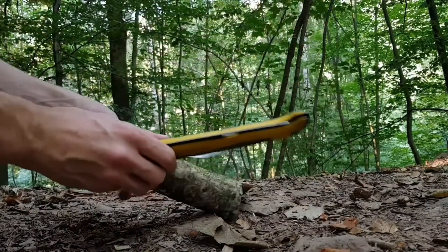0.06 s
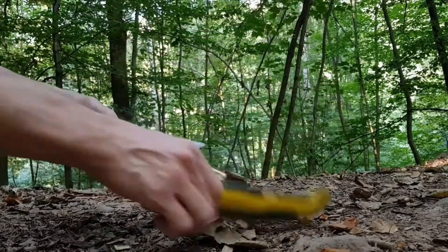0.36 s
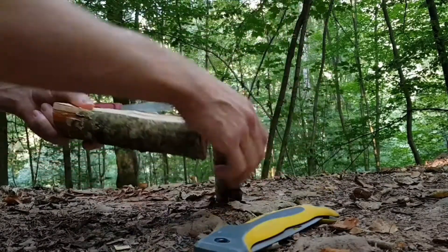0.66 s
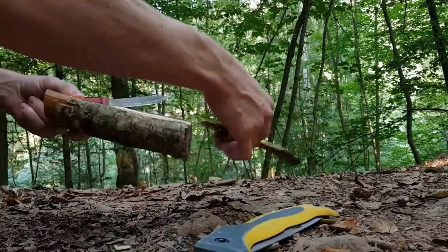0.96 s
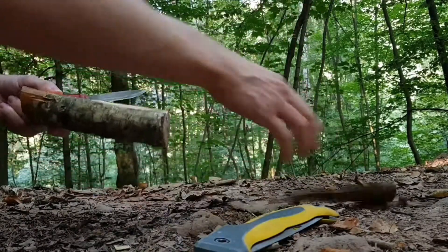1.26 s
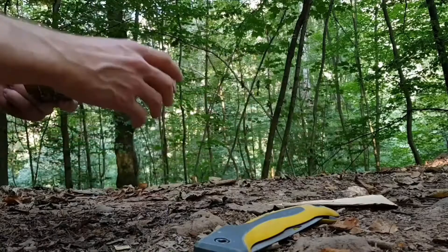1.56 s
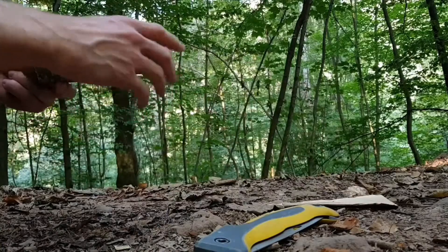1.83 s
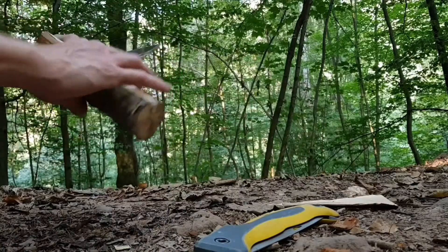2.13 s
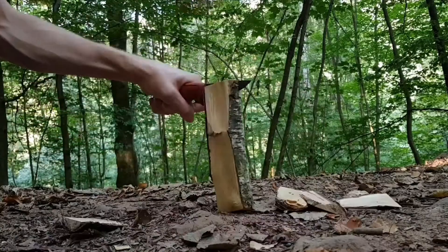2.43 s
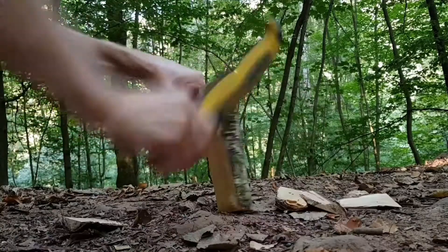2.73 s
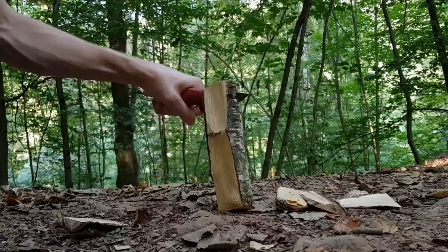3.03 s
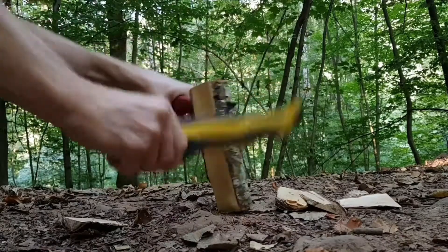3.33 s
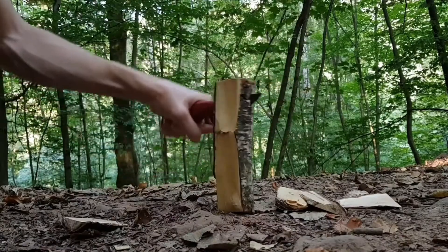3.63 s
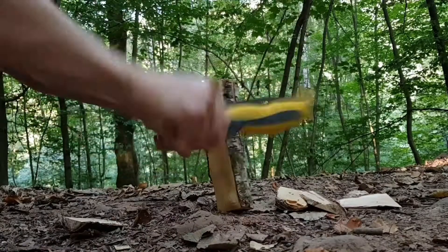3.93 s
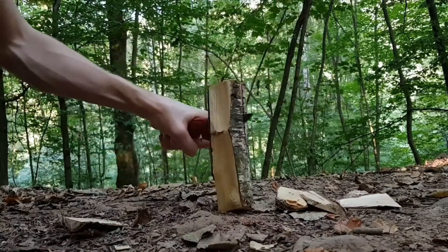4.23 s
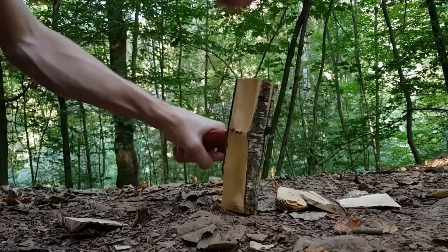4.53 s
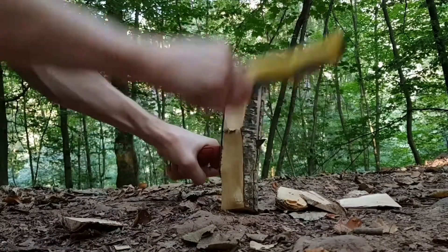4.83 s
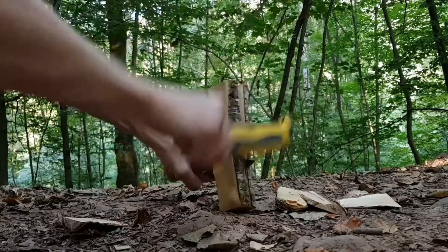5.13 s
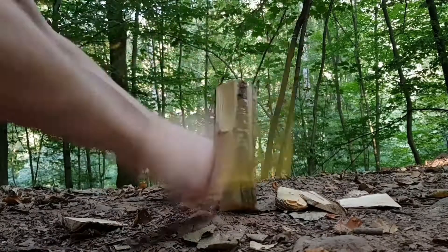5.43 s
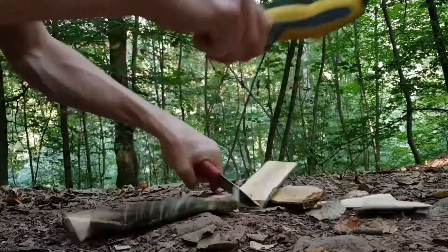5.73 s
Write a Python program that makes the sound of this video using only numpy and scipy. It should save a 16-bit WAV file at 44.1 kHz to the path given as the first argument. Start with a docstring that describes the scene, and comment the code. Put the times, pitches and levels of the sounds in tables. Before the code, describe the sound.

The sounds are close and in stereo on a quiet forest floor. At about 0.4 seconds a soft knock and a crunch of dry leaves lead into a folding saw clattering down at 0.6. A stick lands lightly in the leaves around 1.3. A distant engine hums faintly, clearest near 2.2 seconds. Then the saw's handle strikes a knife wedged in an upright log seven times, at about 2.8, 3.3, 3.9, 4.3, 4.7, 5.1 and 5.5 seconds. Each blow is a sharp clack with a woody thud, a faint ring of steel, a crackle of crushed leaves and a short echo from the trunks. Two barely audible, very high whistles arch up and down near 3.7 and 5.4. The last blow splits the log, and the halves tumble with lighter knocks and rustles until about 5.9, as the soft air in the treetops rises slightly.

```python
"""A knife is beaten down through an upright log, close to a stereo pair of microphones on a forest floor.
A folding saw and a stick drop on dry leaves; then the saw's handle strikes the knife seven times, until
the halves fall apart. Each blow thuds, clacks, rings the steel and grinds the log into crackling litter.
The trunks scatter it back; farther off are a humming engine and the air in the canopy.
Two faint, very high, wavering whistles arch up and down."""
import sys
import numpy as np
from scipy import signal
from scipy.fft import rfft, irfft, next_fast_len
from scipy.io import wavfile

SR = 44100
rng = np.random.default_rng(int(sys.argv[2]) if len(sys.argv) > 2 else 0)


def generate_wav(sig):
    """Save sig (samples, or channels by samples) to the path in sys.argv[1] as 16-bit PCM at SR."""
    pcm = np.round(np.clip(np.atleast_2d(sig).T, -1, 1) * 32767).astype(np.int16)
    wavfile.write(sys.argv[1], SR, pcm)


N = 259308
TOP_HZ = 16000  # the recorder's band limit
CHOPPING_S = 2  # from here on the log stands upright on trodden ground

# the handle strikes the knife's spine: t/s, thud/dB, body/dB, body/Hz, clack/dB, clack/Hz, crack/dB,
# rebound/dB, crushed leaves/dB, their crispness/dB, left-right/dB
BLOWS = [(2.7588, -26.5, -29.5, 700, -10.5, 3900, -20.5, -.5, -27, 4.5, -1.5),
         (3.2504, -21, -23, 730, -15.5, 3350, -17.5, -10, -33, 6, -2),
         (3.8779, -26.5, -28, 1020, -14, 4100, -25, -14, -37, 9.5, -2),
         (4.2802, -26, -23, 1000, -12, 4100, -16, -3.5, -29.5, 8, -4),
         (4.7108, -30, -29, 880, -18.5, 3500, -15, -5, -29.5, 4.5, -3),
         (5.1119, -28.5, -22, 1330, -13.5, 4000, -16, -.5, -27.5, 3.5, -2),
         (5.4886, -23, -21, 1230, -12, 2850, -18.5, 2.5, -23.5, 0, -3)]


def contacts():
    """Every hard contact in front of the microphones: three to a blow, one to a loose knock."""
    # offsets from the blow: delay/s, thud/dB, body/dB, body f ratio, clack/dB, clack f ratio, crack/dB
    touch = (0, -4, -1, 1.03, -4, 1.02, -5.5)  # handle on steel
    bite = (.0024, -1, -2, .68, -.6, .8, 1)  # steel into wood
    rebound = (.0098, -7, -3.5, .95, -5.3, .64, 1.2)  # log against the ground
    # saw, handle and falling halves:
    # t/s, thud/dB, body/dB, body/Hz, body t60/s, clack/dB, clack/Hz, crack/dB, left-right/dB
    loose_knocks = [(0.4042, -31, -33, 400, .027, -60, 2240, -53, -.5),
                    (0.5605, -54, -25.5, 1060, .055, -13.5, 2010, -39, -3),
                    (0.5655, -54, -25, 1075, .11, -20, 1854, -30.5, -10),
                    (4.7711, -39, -27, 1086, .019, -18, 2270, -24.5, -4.5),
                    (5.5023, -21, -20.5, 620, .019, -18.5, 3690, -21, 4.5),
                    (5.537, -34, -29.5, 1200, .018, -31, 2070, -40, 0),
                    (5.6245, -55, -46, 500, .01, -45, 2610, -51, 0),
                    (5.7222, -39, -26.5, 930, .024, -18.5, 2130, -59, -5.5),
                    (5.76, -48, -43, 562, .02, -49, 4710, -57, -7),
                    (5.778, -42, -39, 505, .024, -46, 1630, -49, -3),
                    (5.793, -49, -29, 1543, .07, -26, 1580, -47, 5.5),
                    (5.8064, -45, -32.5, 560, .026, -34, 1630, -61, -.5),
                    (5.8692, -58, -39, 564, .016, -50, 2730, -53, -4)]
    first_thud_hz, thud_rise_hz, loose_thud_hz = 139, 2.5, 190  # the thud rises as the knife sinks
    body_t60 = .017
    for k, row in enumerate(BLOWS):
        s, thud_db, body_db, body_hz, clack_db, clack_hz, crack_db, rebound_db, _, _, pan_db = row
        parted = k == len(BLOWS) - 1
        thud_hz = loose_thud_hz if parted else first_thud_hz + thud_rise_hz * k
        for offsets, db in [(touch, 0), (bite, 0), (rebound, rebound_db)]:
            delay, thud, body, body_ratio, clack, clack_ratio, crack = offsets
            yield (s + delay, thud_db + thud + db, thud_hz,
                   body_db + body + db, body_hz * body_ratio, body_t60,
                   clack_db + clack + db, clack_hz * clack_ratio, crack_db + crack + db, pan_db)
    for s, thud_db, *wood in loose_knocks:
        yield s, thud_db, loose_thud_hz, *wood


def knocks():
    """A contact thumps the ground, sounds two damped wood resonances, cracks and rings."""
    # spectra of a brief bright hiss and of cracking wood: f/Hz, level/dB
    hiss_spectrum = [(2500, -17), (4500, -3.5), (6000, -1), (7500, -8.5), (12000, -10), (16000, -14.5)]
    crack_spectrum = [(3000, -28.5), (5200, -1.5), (6300, 3.5), (8500, -4), (11000, 2), (13000, 1),
                      (16000, -3)]
    # modes of the struck blade and log: f/Hz, level/dB, t60/s
    ring_modes = [(1066, -0.5, .09), (1504, -5.5, 0.16), (1620, 0.5, .16), (1850, -5, 0.25),
                  (2460, -2, .12), (2871, -0.5, 0.13), (4358, -5.5, .09), (4400, -4.5, .09),
                  (6262, -1, 0.08), (7865, 0, .14), (11800, -3.5, 0.092), (12675, -1.5, 0.17)]
    out = np.zeros((2, N))
    clock = np.arange(-SR // 80, SR // 3) / SR
    t = np.maximum(clock, 0)
    for row in contacts():
        s, thud_db, thud_hz, body_db, body_hz, body_t60, clack_db, clack_hz, crack_db, pan_db = row
        # the hiss swells into each knock and dies just after it
        hiss = noise(hiss_spectrum, len(t)) * np.exp(-np.abs(clock) / .0022)
        thud = mode(t, thud_hz, t60=.032, attack=.001)
        thud += .48 * burst(t, band(thud_hz * .96, skirt_db=14), t60=.14, attack=.0015)
        sharpness = min(body_t60 / .017, 3)  # the longer a piece rings, the narrower its resonance
        body = .83 * mode(t, body_hz, body_t60, attack=.0003)
        body += .84 * burst(t, band(body_hz, skirt_db=20 * sharpness), t60=.02, attack=.00098)
        clack = .56 * mode(t, clack_hz, t60=.013, attack=.0002)
        clack += .6 * burst(t, band(clack_hz, skirt_db=48.5), t60=.013, attack=.0004)
        crack = burst(t, crack_spectrum, t60=.016, attack=.0007)
        grip = 1 + rng.normal(0, .0017)  # the wood clamps the blade a little differently each time
        ring = np.zeros((2, len(t)))
        for hz, db, t60 in ring_modes:
            envelope = (clock > 0) * amp(db + rng.normal(0, 2)) * fade(t, t60)
            ring += envelope * np.sin(2 * np.pi * hz * grip * t + rng.uniform(0, 2 * np.pi, (2, 1)))
        wood = amp(thud_db - 4.5) * thud + amp(body_db) * body + amp(clack_db - 2) * clack
        edge = amp(crack_db) * (.85 * crack + amp(-7.5) * hiss + amp(-21.5) * ring)
        add(out, s + clock[0], wood + edge, pan_db)
    return out


def mode(t, hz, t60, attack):
    """A damped resonance, kept to its own band, reaching the two microphones a little apart."""
    t = np.maximum(t - rng.uniform(0, .00009, (2, 1)), 0)
    ringing = np.sin(2 * np.pi * hz * t) * fade(t, t60) * (1 - np.exp(-t / attack))
    own_band = signal.butter(2, [hz / 2, hz * 1.9], "band", fs=SR, output="sos")
    return fixed_energy(signal.sosfilt(own_band, ringing))


def burst(t, spectrum, t60, attack):
    """A crowd of quickly dying resonances, heard as a puff of coloured noise."""
    puff = rng.standard_normal((2, len(t))) * fade(t, t60) * (1 - np.exp(-t / attack))
    return fixed_energy(stereo(puff, spectrum))


def band(centre_hz, skirt_db):
    """The spectrum of a broad resonance, falling by skirt_db two octaves away."""
    return [(centre_hz * 2 ** k, -skirt_db * (k / 2) ** 2) for k in np.arange(-3, 3.5, .5)]


def blade():
    """The steel sings faintly after a blow, lower once wedged, wavering as the wood shifts its grip."""
    free, wedged = (3680, -51.5, .95), (2180, -60, 1.3)  # f/Hz, level/dB, t60/s
    out, t = np.zeros((2, N)), np.arange(SR) / SR
    for k, (s, *_) in enumerate(BLOWS[:-1]):  # the last blow frees the knife
        hz, db, t60 = wedged if k else free
        tone = waver(SR, corner_hz=35) * np.sin(2 * np.pi * hz * t)
        add(out, s, amp(db) * fade(t, t60) * tone, pan_db=-1)
    return out


def leaf_loads():
    """Every load on the leaves: under each blow, under things that land, and under stirring hands."""
    # the log grinds in and settles after a blow: delay/s, level/dB, soil/dB, crispness/dB, rise/s
    grind = [(.026, -.5, -11, 0, .011), (.052, -10, -17, -1, .009)]
    # something lands or shifts: peak t/s, level/dB, soil/dB, crispness/dB, rise/s, left-right/dB
    landings = [(0.398, -63, -3, 8, .012, 0), (0.419, -39, -6, 9, .003, 0),
                (0.433, -30, -15, 13.5, .003, -4), (0.446, -31.5, -11, 6.5, .004, 0),
                (0.467, -34.5, -10, 2.5, .012, -2), (0.573, -27.5, -26, 4, .02, -1),
                (0.623, -29.5, -24, 13.5, .0038, -1), (0.642, -37, -16, 0, .014, -5),
                (0.787, -74, -4, 20, .003, 5), (0.955, -68, -9, 13.5, .009, 1),
                (1.235, -48, -3, 4, .015, -7), (1.261, -41, -6, 7, .007, -4),
                (1.299, -51, -1, 5, .023, -1.5), (2.651, -66, -12, 7, .003, -4),
                (2.736, -48, -6, 2, .007, -18), (2.754, -39, -6, 0, .007, -14),
                (4.492, -60, -8, 0, .03, -2), (4.782, -31, -5, 9.5, .008, -1.5),
                (4.81, -41, -9, -1, .022, -3), (5.251, -57, -5, 2, .009, 0), (5.554, -35, -1, 6, .007, -.5),
                (5.61, -49, 0, -3, .02, 0), (5.708, -46, 3, -2, .016, -1), (5.801, -46, -5, 4.5, .013, -.5)]
    # hands stir the leaves faintly: start/s, end/s, level/dB, crispness/dB
    stirring = [(.125, .33, -80, 17.5), (.71, .84, -73.5, 13), (3.72, 3.82, -75, 6)]
    stirs_per_s, stir_soil_db, stir_rise_s = 16, -3, .034
    for s, *_, leaves_db, crispness_db, pan_db in BLOWS:
        for delay, db, soil_db, crisper_db, rise in grind:
            yield s + delay, leaves_db + db, soil_db, crispness_db + crisper_db, rise, pan_db / 2
    yield from landings
    for start, end, db, crispness_db in stirring:
        for s in np.arange(start, end, 1 / stirs_per_s):
            yield (s + rng.normal(0, .006), db + rng.normal(0, 1.5),
                   stir_soil_db, crispness_db, stir_rise_s, rng.normal(-1, 2))


def crunches():
    """Leaves and fibres give way close by: the crackle swells under the load and dies as it settles."""
    # spectra of soil, woody litter and crisp leaves: f/Hz, level/dB
    soil_spectrum = [(100, -10), (280, -1), (480, 2.5), (700, -0.5), (900, -8.5), (1400, -27)]
    litter_spectrum = [(600, -26.5), (950, -6.5), (1350, -3.5), (1900, -3), (2400, -3), (3200, -5.5),
                       (4300, -4), (6500, -22)]
    crisp_spectrum = [(2800, -17), (4600, -9), (6200, 4), (7200, -2.5), (8000, 1), (9200, 0.5),
                      (12500, 2.5), (16000, -3)]
    out = np.zeros((2, N))
    t = np.arange(-SR // 8, SR // 3) / SR
    for s, db, soil_db, crispness_db, rise, pan_db in leaf_loads():
        tilt_db = 1.3 if s < CHOPPING_S else -1.7  # per octave: loose leaves are brighter than trodden
        t60 = .042 + 5.5 * rise  # the slower the crush, the longer it settles
        abrupt = 1 + np.exp(-rise / .036)  # a quick crush sets in abruptly, a slow one creeps in
        swell = np.exp(-(np.maximum(-t, 0) / rise) ** abrupt) * fade(t, t60)
        soil = noise(soil_spectrum, len(t))
        woody = crackle(hollowed(litter_spectrum, depth_db=6.5), len(t), rate=700, spread_db=.5, bed=.6)
        treble = [(hz, level + tilt_db * np.log2(hz / 9000)) for hz, level in crisp_spectrum]
        crisp = crackle(hollowed(treble, depth_db=2.5), len(t), rate=5800, spread_db=5, bed=1)
        crunch = amp(soil_db) * soil + woody + amp(crispness_db) * crisp
        add(out, s + t[0], amp(db) * swell * crunch, pan_db)
    return out


def crackle(spectrum, n, rate, spread_db, bed):
    """Tiny fractures of unequal size, rate a second, on a bed of finer ones."""
    breaks = rng.random(n) < rate / SR
    sizes = amp(spread_db * np.minimum(rng.exponential(size=n), 3))
    snaps = unit(breaks * sizes * rng.uniform(-1.2, 1, (2, n)))
    return stereo(snaps + bed * rng.standard_normal((2, n)), spectrum)


def hollowed(spectrum, depth_db):
    """Ripple a spectrum: every leaf and splinter has narrow resonances of its own."""
    hz = np.arange(100, TOP_HZ, 110)
    return np.transpose([hz, along(spectrum, hz) + depth_db * rng.uniform(-1, 1, len(hz))])


def tree_tail(n):
    """Scatter from many trunks, each frequency dying at its own speed."""
    # the scatter's spectrum: f/Hz, level/dB
    echo_spectrum = [(100, -15), (350, -7), (1000, -5), (2200, -5), (3600, -1.5), (6000, 0.5), (9000, -2),
                     (16000, -7)]
    # its decay among the trees: f/Hz, t60/s
    decay_times = [(150, .8), (1000, .5), (2500, 1), (6000, 0.42), (15000, 0.42)]
    hz, t, bands = signal.stft(noise(echo_spectrum, n), SR, nperseg=256)
    dying = bands * fade(t, along(decay_times, hz)[:, None])
    return signal.istft(dying, SR, nperseg=256)[1][:, :n]


def tree_echo(x, build_s):
    """The trees answer; the scatter builds up as farther trunks join in."""
    tail = tree_tail(SR) * (1 - np.exp(-np.arange(SR) / SR / build_s))
    return signal.fftconvolve(x, tail / np.linalg.norm(tail[0]), axes=1)[:, :N]


def lone_echo(s, db, attack):
    """A soft wash of forest echo swells up and dies away."""
    out, t = np.zeros((2, N)), np.arange(SR) / SR
    wash = unit(filtered(tree_tail(SR), lambda hz: hz / np.hypot(hz, 900) / np.hypot(1, hz / 4000)))
    envelope = fade(t, 8) * (1 - np.exp(-(t / attack) ** 2))
    add(out, s, amp(db) * envelope * wash, pan_db=-2)
    return out


def engine():
    """Far off through the forest, a throb, a drone at three times its rate and an octave come and go."""
    # the drone's pitch: t/s, f/Hz
    pitch = [(0, 173.4), (.52, 171.3), (.75, 173.3), (1.25, 168.5), (1.4, 172.5), (1.7, 173), (2.15, 170.8),
             (2.42, 171), (2.6, 179.5), (3.0, 179), (3.3, 174), (3.75, 179)]
    # loudness of the throb, the drone and its octave: t/s, level/dB
    throb = [(2.35, -79), (2.6, -64)]
    drone = [(0, -63), (.52, -54.5), (.87, -53), (.93, -64), (1.05, -52), (1.3, -49), (1.55, -58),
             (1.75, -51), (2.15, -44), (2.3, -49), (2.5, -69), (3.18, -55), (3.45, -69), (5.35, -61)]
    octave = [(0, -76), (.52, -66.5), (.77, -58), (1.05, -79), (1.25, -68), (1.36, -54), (1.58, -59.5),
              (1.72, -73), (2.6, -83)]
    hz, throb_db, drone_db, octave_db = curves(pitch) + curves(throb) + curves(drone) + curves(octave)
    phase = 2 * np.pi * np.cumsum(hz) / SR
    hum = amp(throb_db) * np.sin(phase / 3) + amp(drone_db) * np.sin(phase)
    hum += amp(octave_db) * np.sin(2 * phase)
    return hum * np.sqrt(2) * amp([[-.4], [.4]])


def whistles():
    """Two faint, very high, wavering whistles arch up and down."""
    # each whistle's crest: t/s, f/Hz, level/dB, half-length/s
    crests = [(3.73, 13000, -70, .06), (5.39, 12700, -67, .05)]
    out, t = np.zeros((2, N)), np.arange(-SR // 8, SR // 8) / SR
    for s, crest_hz, db, half in crests:
        hz = crest_hz * np.exp(-.08 * (t / half) ** 2)
        tone = waver(len(t), corner_hz=150) * np.sin(2 * np.pi * np.cumsum(hz) / SR)
        add(out, s + t[0], amp(db) * np.exp(-(t / half) ** 2) * tone, pan_db=4)
    return out


def forest():
    """The quiet of the place: distant rumble, air in the canopy and a thin hiss."""
    # their slow drift: t/s, rumble/dB, air/dB, hiss/dB
    levels = [(0, -59, -73, -73.5), (1, -57.5, -73.5, -77.5), (2.35, -58, -75, -76), (2.55, -58, -72, -80),
              (4.2, -59.5, -69.5, -81), (5.88, -53.5, -61.5, -75)]
    # their spectra: f/Hz, level/dB
    rumble = [(20, -31), (38, -11.5), (55, 2.5), (78, -5), (100, 0), (140, -6.5), (220, -6), (300, -16.5),
              (450, -23), (700, -36), (1500, -56)]
    air = [(200, -5), (500, 7), (1000, -2), (2200, -6.5), (4000, -8), (8000, -14), (16000, -14.5)]
    hiss = [(4000, -21), (8500, -18.5), (10500, -0.5), (13000, 3.5), (16000, -11)]
    return sum(amp(db) * noise(spectrum, N) for db, spectrum in zip(curves(levels), [rumble, air, hiss]))


def stereo(pair, spectrum):
    """Colour two unrelated signals into left and right of rms 1, alike in the bass."""
    # how alike the two microphones hear the place: f/Hz, correlation
    likeness = [(60, 0.98), (300, .92), (700, 0.58), (1400, 0.34), (3100, .35), (6500, 0), (16000, 0.067)]

    def mid_side(hz):
        turn = np.arccos(np.clip(along(likeness, hz), -1, 1)) / 2
        return amp(along(spectrum, hz)) * [np.cos(turn), np.sin(turn)]

    mid, side = filtered(pair, mid_side)
    return unit(np.array([mid + side, mid - side]))


def noise(spectrum, n):
    """Coloured stereo noise of rms 1."""
    return stereo(rng.standard_normal((2, n)), spectrum)


def waver(n, corner_hz):
    """A slow random gain of rms 1 for each microphone."""
    return unit(filtered(rng.standard_normal((2, n)), lambda hz: 1 / (1 + (hz / corner_hz) ** 2)))


def amp(db):
    """Decibels to gain."""
    return 10 ** (np.asarray(db) / 20)


def unit(x):
    """Scale to rms 1."""
    return x / np.sqrt(np.mean(x ** 2) + 1e-20)


def fixed_energy(x):
    """Scale a short sound to the energy of 5 ms at rms 1."""
    return x * np.sqrt(.005 * SR / np.sum(np.mean(x ** 2, axis=0)))


def fade(t, t60):
    """Exponential decay, 60 dB in t60 seconds."""
    return np.exp(-np.log(1000) * np.maximum(t, 0) / t60)


def along(points, hz):
    """Read (f/Hz, value) points on a log axis."""
    f, v = np.transpose(points)
    return np.interp(np.log(hz + 1), np.log(f + 1), v)


def curves(rows):
    """One value per sample for each column after the time."""
    s, *cols = np.transpose(rows)
    return [np.interp(np.arange(N) / SR, s, c) for c in cols]


def filtered(x, response):
    """Shape x by a gain that depends on frequency."""
    n = x.shape[-1]
    m = next_fast_len(n + 8192)
    return irfft(rfft(x, m) * response(np.fft.rfftfreq(m, 1 / SR)), m)[..., :n]


def add(track, s, x, pan_db):
    """Mix a stereo sound into the track at time s, leaning left by pan_db."""
    start = round(s * SR)
    x = x[:, max(-start, 0):max(N - start, 0)] * unit(amp([[pan_db / 2], [-pan_db / 2]]))
    track[:, max(start, 0):][:, :x.shape[1]] += x


def scene():
    """The work close to the microphones, its echo among the trunks and the forest behind."""
    wood, leaves = knocks(), crunches()
    # the log beams its sharpest clack forward, so less of it reaches the trees: f/Hz, level/dB
    to_trees = [(2300, -.5), (3400, -7), (4800, -6.5), (6500, .5)]
    spread = filtered(wood, lambda hz: amp(along(to_trees, hz)))
    # things dropped flat on the leaves send less into the trees
    send = np.where(np.arange(N) / SR < CHOPPING_S, amp(-13), 1)
    trees = tree_echo(send * (amp(-27) * spread + amp(-22) * leaves), build_s=.0053)
    close = wood + leaves + blade()
    return close + trees + lone_echo(s=2.422, db=-61.5, attack=.033) + engine() + whistles() + forest()


def record(dry):
    """Each microphone has its own colour; the recorder cuts the deepest bass and the highest treble."""
    # the mismatch of the pair: f/Hz, left-right/dB
    mismatch = [(250, -0.5), (2000, -1), (4300, -0.5), (7500, -1), (12000, 4.5), (16000, 4)]
    coloured = filtered(dry, lambda hz: amp(along(mismatch, hz) / 2) ** np.array([[1], [-1]]))
    low_cut = signal.sosfilt(signal.butter(2, 27, "high", fs=SR, output="sos"), coloured)
    return filtered(low_cut, lambda hz: 1 / np.sqrt(1 + (hz / TOP_HZ) ** 160))


dry = scene()
out = record(dry)
generate_wav(out)
```